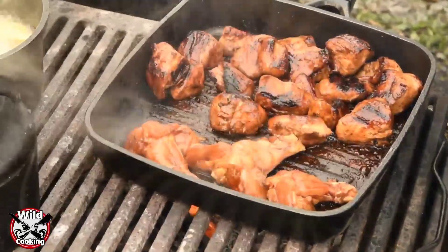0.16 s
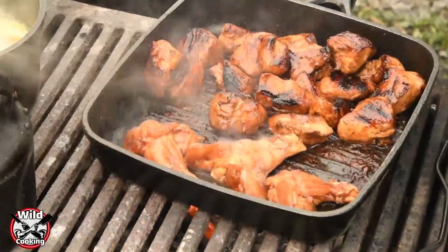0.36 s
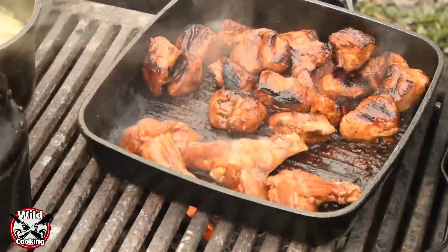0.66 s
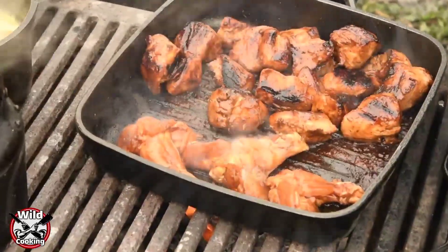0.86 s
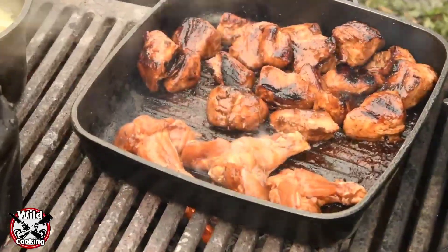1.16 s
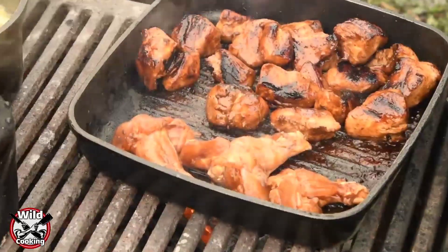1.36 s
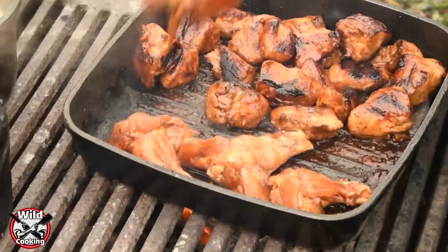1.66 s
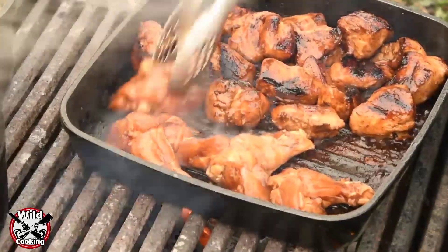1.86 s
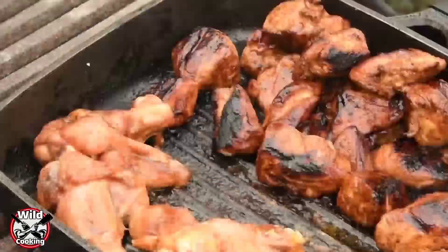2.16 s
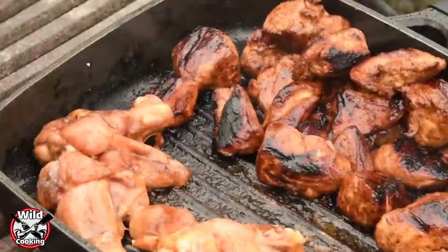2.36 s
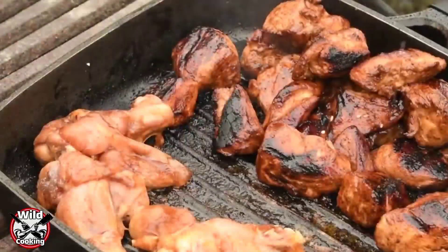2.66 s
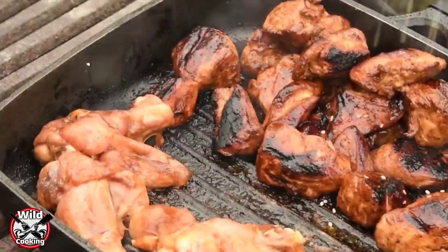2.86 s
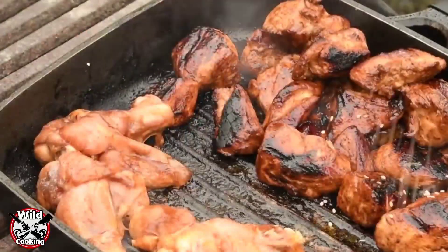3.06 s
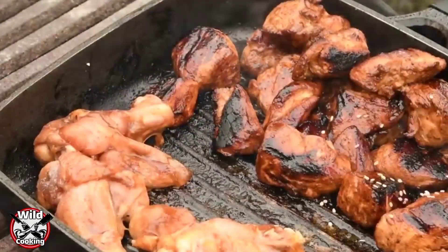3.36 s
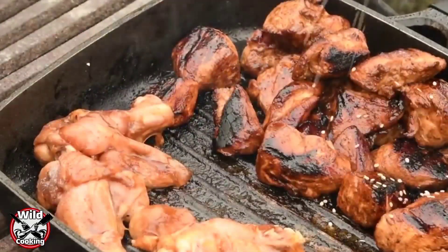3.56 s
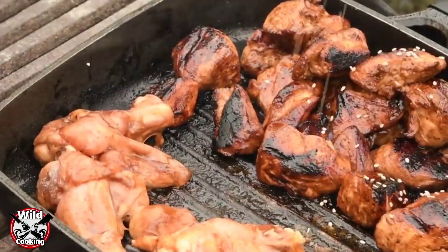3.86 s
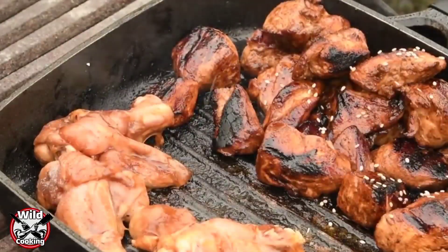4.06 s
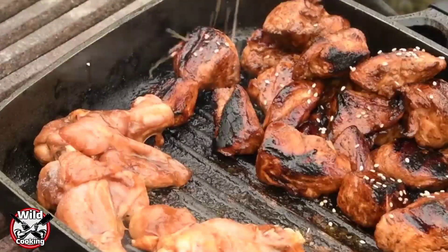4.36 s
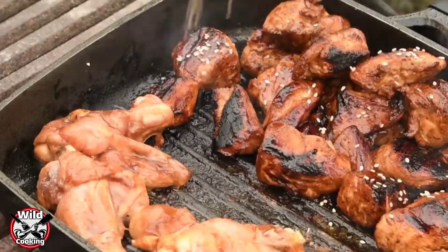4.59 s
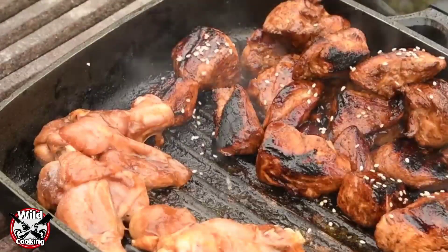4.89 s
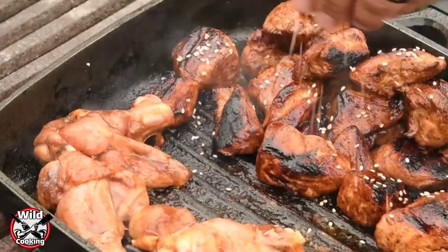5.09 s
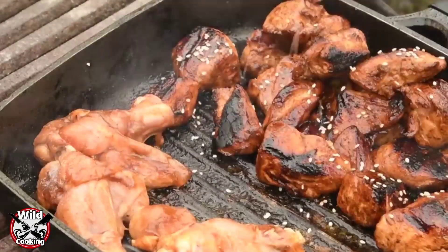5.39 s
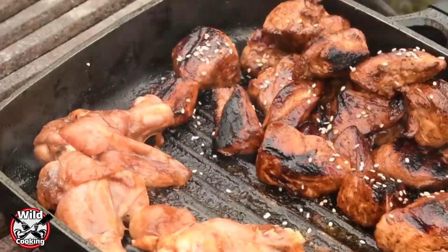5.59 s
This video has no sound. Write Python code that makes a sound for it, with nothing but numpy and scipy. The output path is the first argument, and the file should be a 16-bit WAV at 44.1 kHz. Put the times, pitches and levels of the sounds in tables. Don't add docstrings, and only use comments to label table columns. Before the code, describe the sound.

Chicken pieces sizzle hard in a cast-iron pan over a fire, dense hiss with sharp spits and bright ticks, easing slightly over time.

```python
import sys
import numpy as np
from scipy import signal
from scipy.fft import irfft
from scipy.io import wavfile
from scipy.ndimage import uniform_filter1d

SR = 44100
rng = np.random.default_rng(int(sys.argv[2]) if len(sys.argv) > 2 else 0)


def invert_db(level):
    return 10 ** (np.asarray(level, dtype=float) / 20)


def pcm_store(signal):
    levels = np.round(np.clip(np.atleast_2d(signal), -1, 1) * 32767)
    wavfile.write(sys.argv[1], SR, levels.astype(np.int16).T)


N = 252693

# lowest frequency
# in Hz, highest in Hz, share of separate bubbles from 0 to 1, patchiness in dB, gust depth in dB.
SIZZLE_LAYERS = [
    (10, 209, 0.26, -2, -0.5),
    (225, 1490, 0.33, 0.5, 1.07),
    (1550, 4220, 0.46, 0.92, 0.42),
    (5650, 11250, 0.55, 1.5, 1),
    (9730, 13800, 0.45, 0.6, 0.9),
]


def sizzle():
    t = np.arange(N) / SR
    stft_frames = dict(fs=SR, nperseg=256, noverlap=192)
    level_curves_db, fizz_db = layer_levels_db(t)

    hz, frame_s, steam = signal.stft(rng.standard_normal(N), **stft_frames)
    patches = uniform_filter1d(rng.standard_normal(steam.shape), size=5, axis=0)
    patches = evened(uniform_filter1d(patches, size=20, axis=1))
    gusts = evened(uniform_filter1d(rng.standard_normal(len(frame_s)), size=8))
    popping = signal.stft(bubbles(per_s=5000, spread_db=4.5, cycles=1.6), **stft_frames)[2]
    popping_power = np.mean(abs(popping) ** 2, axis=1, keepdims=True)
    popping *= np.sqrt(np.mean(abs(steam) ** 2) / popping_power)

    apart = np.clip(1 - 0.053 * (np.interp(frame_s, t, fizz_db) + 34), .2, 1.5)
    fine_hz = np.fft.rfftfreq(4096, 1 / SR)
    out = np.zeros(N)
    for level_db, (lo, hi, share, patch_db, gust_db) in zip(level_curves_db, SIZZLE_LAYERS):
        share = np.clip(share * apart, 0, 1)
        blend = np.sqrt(1 - share) * steam + np.sqrt(share) * popping
        blend *= invert_db(patch_db * patches + gust_db * gusts)
        drive = signal.istft(blend, **stft_frames)[1][:N]
        band_power = 1 / ((1 + (lo / (fine_hz + 1)) ** 8) * (1 + (fine_hz / hi) ** 8))
        response = causal(colour_db(fine_hz) + 10 * np.log10(band_power))
        out += invert_db(level_db) * evened(signal.oaconvolve(drive, response)[:N])
    return out


def layer_levels_db(t):
    boil_db, surge_db = steam_db(t)
    fire_db = fire_flutter_db(t)
    fire_stir_db = 0.18 * (fire_db - fire_db.mean())
    deep_db = -29.5 + fire_stir_db + 0.58 * boil_db - 0.23 * surge_db
    body_db = SIMMER_DB + boil_db + np.minimum(surge_db, 0)
    fizz_db = -35.5 + 1.05 * boil_db + surge_db
    air_db = 1.614 * fizz_db + 14
    return [fire_db, deep_db, body_db, fizz_db, air_db], fizz_db


SIMMER_DB = -22
# time in seconds, level in dB.
BOIL = [(0, -18), (.2, -20.5), (.38, -19), (.75, -22.5), (.88, -18.5), (1.1, -21.5), (1.21, -21.5),
        (1.43, -19.5), (2.06, -21), (2.17, -18), (2.31, -17.5), (2.42, -23.5), (2.64, -21), (2.95, -23.5),
        (3.3, -21.5), (3.58, -24), (4.5, -22), (5.73, -22.6)]
# middle in seconds, lift in dB, half length in seconds.
STEAM_PUFFS = [(0.133, 6.5, 0.11), (0.333, 4.5, 0.055), (.6, 4, 0.13), (1.11, 6, 0.088), (1.65, 4.5, 0.064),
               (1.88, 3.5, .07), (2.25, 6.5, 0.11), (2.44, 3, 0.032), (2.86, 0, 0.07), (3.18, -1, 0.081),
               (.9, -1.5, 0.092), (5.1, 1, 0.09), (3.744, 3.5, .08), (4.463, 2, 0.21), (4.724, -2, 0.042),
               (4.88, 3, 0.15), (5.407, 2.5, 0.082), (5.7, 3, 0.19)]


def steam_db(t):
    surge_db = sum(db * np.exp(-((t - s) / half) ** 2) for s, db, half in STEAM_PUFFS)
    return np.interp(t, *np.transpose(BOIL)) - SIMMER_DB, surge_db


def bubbles(per_s, spread_db, cycles, count=24):
    size = invert_db(spread_db * np.minimum(rng.exponential(1, N), 3.5))
    size *= rng.random(N) < per_s / SR
    size *= rng.choice([-1, 1], N)
    kind = rng.integers(0, count, N)
    out = np.zeros(N)
    for k, hz in enumerate(np.geomspace(700, 14000, count)):
        shape = evened(burst(hz, cycles)) * np.sqrt(hz)
        out += signal.oaconvolve(size * (kind == k), shape)[:N]
    return evened(out)


def burst(hz, cycles, size=200):
    turns = hz * np.arange(size) / SR
    wave = np.sin(2 * np.pi * turns * (1 + 0.022 * turns)) * np.exp(-turns / cycles)
    return wave / abs(wave).max()


# time in seconds, level in dB.
CHORUS = [
    (0, -28),
    (.7, -34.5),
    (1.2, -26),
    (1.8, -26.5),
    (2.3, -33),
    (2.5, -33.5),
    (5.73, -38),
]


def chorus():
    centre_hz, width_hz = 3182, 470
    fine_hz = np.fft.rfftfreq(2048, 1 / SR)
    band = causal(-12 * ((fine_hz - centre_hz) / width_hz) ** 2)
    flicker = evened(uniform_filter1d(rng.standard_normal(N), size=60))
    drive = rng.standard_normal(N) * invert_db(4.8 * flicker)
    level_db = np.interp(np.arange(N) / SR, *np.transpose(CHORUS))
    return invert_db(level_db) * evened(signal.oaconvolve(drive, band)[:N])


# time in seconds, peak in dB, centre in Hz.
LOUD_SPITS = [(0.048, -5, 2700), (0.1143, -4, 3100), (0.2594, -6, 2600), (0.3475, -5, 2900),
              (0.4176, -6, 2500), (0.5345, -6, 2200), (0.6212, -7, 3500), (0.9191, -6, 2400),
              (0.9967, -5, 2900), (1.0826, -4, 3200), (1.1132, -1, 3000), (1.2331, -5, 2500),
              (1.5319, -6, 2800), (1.6415, -5, 2900), (1.7886, -3, 3100), (1.8779, -5, 2600),
              (2.0788, -4, 3100), (2.3659, -6, 3300), (2.7993, -5, 2800), (2.8616, -5, 2500),
              (2.9546, -6, 3200), (3.3302, -6, 3100), (3.5215, -3, 3100), (4.0161, -8, 3900),
              (4.1423, -6, 3200), (4.5484, -5, 3200), (4.6602, -3, 2400), (4.9574, -6, 3100),
              (5.192, -7, 2400), (5.3877, -5, 3000)]
# time in seconds, peak in dB, centre in Hz.
CLEAR_TICKS = [(0.0687, -10, 7200), (0.1458, -11, 7300), (0.2573, -14, 7400), (0.5889, -13, 7600),
               (0.6211, -14, 7600), (0.6801, -16, 7800), (1.0858, -10, 7300), (1.5775, -14, 8100),
               (1.8287, -11, 7800), (1.9322, -14, 7500), (2.4995, -17, 7600), (2.8302, -19, 9400),
               (2.8541, -14, 9100), (2.9783, -18, 8700), (3.3128, -16, 8100), (3.6702, -18, 7900),
               (3.7746, -16, 8500), (3.7802, -14, 7600), (3.8028, -18, 8300), (4.467, -8, 9100),
               (4.5484, -14, 7200), (4.62, -18, 8800), (4.9132, -15, 8400), (4.9958, -19, 8400),
               (5.0912, -15, 9500), (5.2971, -16, 8800), (5.4598, -19, 9100), (5.5938, -18, 7200),
               (5.6542, -16, 7700), (5.6841, -16, 7400)]


def spits():
    lesser_spits = scattered(peak_db=-15, spread_db=5, follow=0.38, lo_hz=2200, hi_hz=4600, count=320)
    lesser_ticks = scattered(peak_db=-27.5, spread_db=9, follow=0.4, lo_hz=7100, hi_hz=9800, count=200)
    body = cracks([*LOUD_SPITS, *lesser_spits], lo_hz=600, octaves=0.93, lift_db=0.5,
                  spray_share=0.041, spray_s=0.00086)
    thin = cracks([*CLEAR_TICKS, *lesser_ticks], lo_hz=5070, octaves=0.88, lift_db=-1.0,
                  spray_share=0.34, spray_s=0.00075)
    return body + thin


def scattered(peak_db, spread_db, follow, lo_hz, hi_hz, count):
    at, size, pitch = rng.random((count, 3)).T
    s = (np.arange(count) + at) / count * (N / SR - .02) + .01
    level_db = peak_db + spread_db * size ** 2 + follow * steam_db(s)[0]
    centre_hz = lo_hz * (hi_hz / lo_hz) ** pitch ** 1.4
    return np.transpose([s, level_db, centre_hz])


def cracks(events, lo_hz, octaves, lift_db, spray_share, spray_s):
    out, t = np.zeros(N), np.arange(200) / SR
    fine_hz = np.fft.rfftfreq(1024, 1 / SR)
    base_db = colour_db(fine_hz) - 40 / (1 + (fine_hz / lo_hz) ** 6)
    for (s, db, hz), spray in zip(events, rng.standard_normal((len(events), 200))):
        away = np.log2((fine_hz + 1) / hz)
        tilt_db = 2.5 * away * (hz > 8300)
        bell_db = tilt_db - 6 * (away / octaves) ** 2
        spike = np.roll(irfft(invert_db(base_db + bell_db)), 100)[:300]
        spray_tail = (t > 0) * spray_share * spray * np.exp(-t / spray_s)
        sound = np.convolve((t == 0) + spray_tail, spike)
        peak = abs(spike)
        add(out, s - peak.argmax() / SR, invert_db(db + lift_db) * sound / peak.max())
    return out


# time in seconds, peak in dB, pitch in Hz, length in seconds.
SOFT_KNOCKS = [(.181, -29, 250, .008), (.342, -31, 200, .007), (.399, -35, 200, .005),
               (1.221, -25, 220, .0045), (2.693, -31, 300, .005), (3.114, -34, 160, .007),
               (3.383, -31, 330, .006), (3.579, -28, 220, .007), (4.322, -23, 450, .005),
               (4.378, -25, 200, .004), (4.653, -27, 260, .0045), (4.891, -30, 200, .006)]


def knocks():
    out, t = np.zeros(N), np.arange(-800, 800) / SR
    for s, db, hz, length in SOFT_KNOCKS:
        bump = np.exp(-2 * (t / length) ** 2) * np.sin(2 * np.pi * hz * t)
        add(out, s + t[0], invert_db(db) * bump)
    return out


# time in seconds, level in dB.
FIRE_FLUTTER = [(0, -52), (.4, -52), (.9, -51), (1.3, -53), (1.85, -53.5), (2.3, -57), (2.7, -48.5),
                (2.9, -50.5), (3.05, -42.5), (3.25, -50), (3.6, -47.5), (4, -50), (4.4, -45), (4.8, -46.5),
                (5.1, -48.5), (5.4, -54), (5.73, -45.5)]


def fire_flutter_db(t):
    return np.interp(t, *np.transpose(FIRE_FLUTTER))


def rumble():
    return invert_db(-72) * evened(signal.lfilter([1], [1, -.995], rng.standard_normal(N)))


# frequency in Hz, level in dB per Hz.
BROAD_COLOUR = [(15, -70), (25, -56.5), (188, -18.5), (510, -10), (785, -1.5), (1000, -5.5), (2930, -1.5),
                (4770, -9.5), (5450, -5), (6240, -13), (7140, -21), (7950, -20.5), (11000, -27.5),
                (15600, -35)]
# centre in Hz, width in Hz, lift in dB.
HOUSING = [(826, 480, -3), (2880, 360, 2), (3975, 810, 5), (5560, 800, 1), (7113, 730, 12.5),
           (8890, 1020, 9.5), (10780, 800, 8), (12000, 480, -5.5), (12850, 1400, 6), (14060, 800, -7.5),
           (14500, 600, 8.5), (14900, 250, -5)]


def colour_db(hz):
    f, db = np.transpose(BROAD_COLOUR)
    lifts = sum(lift * np.exp(-2 * ((hz - at) / width) ** 2) for at, width, lift in HOUSING)
    return np.interp(np.log(hz + 1), np.log(f + 1), db) + lifts


def causal(db):
    log_gain = np.log(invert_db(np.maximum(db, -100)))
    circle = np.concatenate([log_gain, log_gain[-2:0:-1]])
    spectrum = np.exp(circle - 1j * signal.hilbert(circle).imag)
    return np.fft.ifft(spectrum).real[:len(db)]


def evened(x):
    return x / np.sqrt(np.mean(x ** 2) + 1e-20)


def add(mix, s, sound):
    part = mix[round(s * SR):][:len(sound)]
    part += sound[:len(part)]


def scene():
    return (sizzle() + chorus() + spits() + knocks() + rumble())[None]


def band_limit(x):
    return signal.sosfilt(signal.butter(12, 15730, fs=SR, output="sos"), x)


# time in seconds, dip in dB,
# recovery in seconds.
OVERLOADS = [(.114, 4, 0.035), (.259, 3, 0.027), (.4176, 1.5, 0.021), (1.1132, 4, 0.045),
             (1.5319, 4, 0.029), (1.7886, 3.5, 0.062), (2.8, 8, 0.024), (3.3301, 3.5, 0.069),
             (3.5215, 6, 0.035), (4.47, 3.5, 0.073), (4.5484, 3.5, 0.096), (4.6602, 5.5, 0.11),
             (4.9565, 4, 0.063), (5.387, 4.5, 0.068)]


def record(dry):
    t, dip_db = np.arange(N) / SR, np.zeros(N)
    for s, db, recovery in OVERLOADS:
        since = np.maximum(t - s - .001, 0)
        dip_db += db * (1 - np.exp(-since / 0.0026)) * np.exp(-(since / recovery) ** 2)
    edge = signal.firwin(401, 15490, window=("kaiser", 1), fs=SR)
    mix = signal.oaconvolve(dry / invert_db(dip_db), edge[None], "same")
    return band_limit(mix)


dry = scene()
out = record(dry)
pcm_store(out)
```